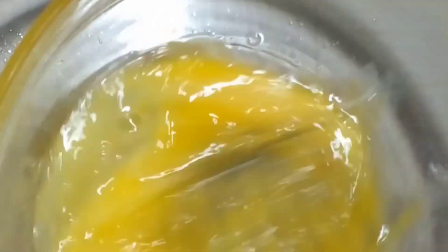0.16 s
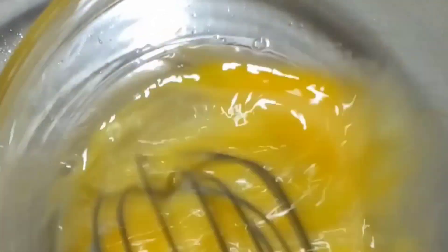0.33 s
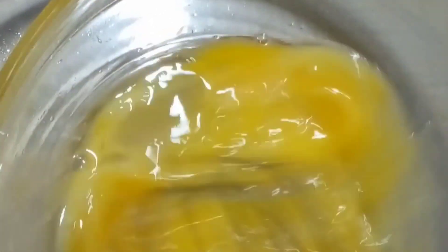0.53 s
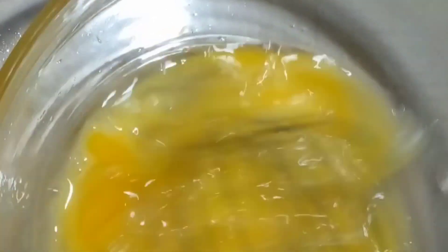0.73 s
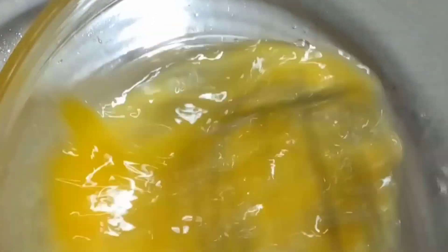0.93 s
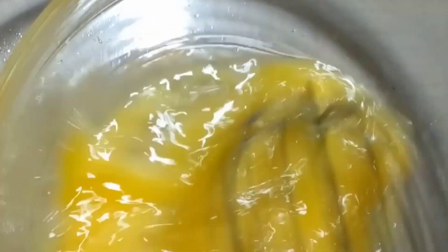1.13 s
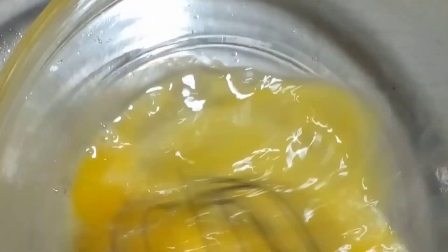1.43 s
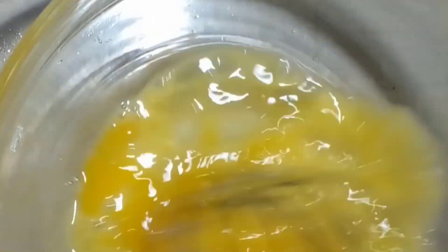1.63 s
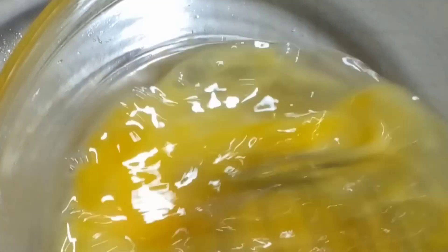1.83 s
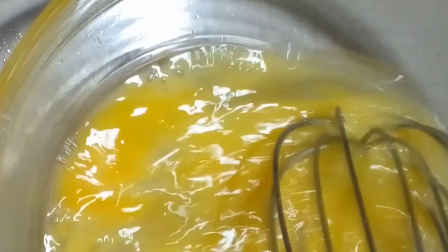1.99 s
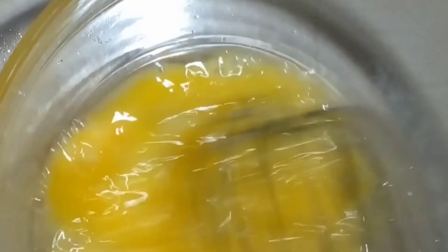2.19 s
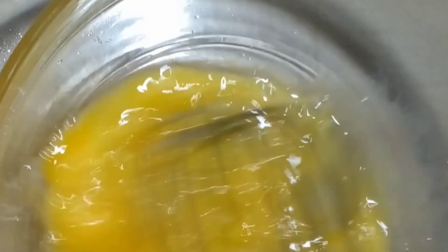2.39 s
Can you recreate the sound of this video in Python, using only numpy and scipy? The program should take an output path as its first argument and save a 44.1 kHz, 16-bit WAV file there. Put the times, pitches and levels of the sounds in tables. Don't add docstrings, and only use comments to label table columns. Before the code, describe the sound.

A wire whisk beats eggs in a glass bowl, about five rattling strokes a second, with wet plops, popping bubbles and dull bowl knocks, heard close up in a small hard-walled kitchen.

```python
import sys
import numpy as np
from scipy import signal
from scipy.fft import rfft, irfft
from scipy.io import wavfile
from scipy.ndimage import uniform_filter1d

SR = 44100
rng = np.random.default_rng(int(sys.argv[2]) if len(sys.argv) > 2 else 0)


def amplitude_ratio(level_db):
    exponent = np.asarray(level_db, float) / 20
    return 10 ** exponent


def persist_wave(psi):
    counts = np.round(np.clip(psi, -1, 1) * 32767).astype(np.int16)
    wavfile.write(sys.argv[1], SR, np.atleast_2d(counts).T)


N = 112454

# (time [s], rattle level [dB], bowl push level [dB], rattle t60 [s])
STRIKES = [(0.0014, -46.5, -67, 0.1), (0.025, -47.5, -92, 0.02), (0.078, -54, -85, 0.11),
           (0.097, -48, -73, 0.062), (0.1166, -61, -72, 0.093), (0.2264, -44.5, -60, 0.037),
           (0.2285, -22.5, -36, 0.043), (0.24, -35, -52, 0.017), (0.2794, -28.5, -41.5, 0.012),
           (0.4827, -21, -45, 0.048), (0.495, -26.5, -36.5, 0.047), (0.6885, -19, -34.5, 0.036),
           (0.6973, -22.5, -52, 0.033), (0.753, -43, -45.5, 0.017), (0.7217, -37, -34.5, 0.011),
           (0.879, -37, -79, 0.023), (0.8895, -23.5, -39, 0.035), (0.9004, -26, -42.5, 0.015),
           (0.9112, -24.5, -38, 0.027), (0.9185, -23.5, -45.5, 0.015), (0.929, -52, -34, 0.02),
           (1.082, -28.5, -41.5, 0.017), (1.1072, -30.5, -38, 0.028), (1.1657, -26.5, -43, 0.036),
           (1.3612, -32, -48.5, 0.019), (1.3873, -32, -44, 0.029), (1.5677, -35, -50, 0.03),
           (1.5784, -24, -42.5, 0.011), (1.598, -48, -46.5, 0.032), (1.5861, -38, -45, 0.013),
           (1.7559, -48, -50.5, 0.028), (1.7905, -46.5, -42.5, 0.04), (1.7955, -25, -40, 0.032),
           (1.832, -38.5, -44, 0.028), (2.0075, -23, -35, 0.05), (2.0138, -22, -34, 0.033),
           (2.026, -37, -42, 0.05), (2.0398, -34, -38, 0.039), (2.0541, -48, -38, 0.028),
           (2.116, -42, -42, 0.067), (2.2028, -40, -48, 0.032), (2.2286, -35, -46, 0.039),
           (2.2475, -42, -56, 0.016), (2.274, -41, -48, 0.033), (2.4001, -39, -45, 0.03),
           (2.445, -48, -51, 0.01)]
# (frequency [Hz], density [dB per Hz])
SCRAPE_TONE = [(150, -5), (400, -19.5), (750, -13.5), (1500, -2), (3000, 1), (8000, -7), (16000, -4)]


def unit(x):
    return x / np.sqrt(np.mean(x ** 2))


def curve(rows, hz):
    rows = np.array(rows, float)
    return np.interp(np.log(hz + 1), np.log(rows[:, 0]), rows[:, 1])


def colour(x, rows):
    gain_db = curve(rows, np.fft.rfftfreq(len(x), 1 / SR))
    return irfft(rfft(x) * amplitude_ratio(gain_db), len(x))


def butter(x, order, hz, kind):
    return signal.sosfilt(signal.butter(order, hz, kind, fs=SR, output="sos"), x)


def ring(x, hz, t60):
    r = np.exp(-np.log(1000) / (max(t60, .001) * SR))
    w = 2 * np.pi * hz / SR
    return signal.lfilter([0, r * np.sin(w)], [1, -2 * r * np.cos(w), r * r], x)


def swells(times, db, t60, rise):
    out = np.zeros(N)
    for s, level, fall in zip(times, db, np.maximum(t60, .002)):
        i = int(s * SR)
        u = np.arange(min(N - i, int(fall * SR))) / SR
        out[i:i + len(u)] += amplitude_ratio(level - 60 * u / fall) * (1 - np.exp(-u / rise))
    return out


def contacts():
    per_s, scatter_db = 11000, 2
    clump_s, clump_db = .004, 5
    chance, sign, size = rng.random((3, N))
    clicks = (chance < per_s / SR) * np.sign(sign - .5)
    clicks = unit(clicks * amplitude_ratio(-scatter_db * np.log(size + 1e-9)))
    k = int(clump_s * SR)
    steps = np.repeat(rng.standard_normal(N // k + 1), k)[:N]
    return unit(clicks * amplitude_ratio(clump_db * uniform_filter1d(steps, k // 2)))


def whisk():
    # (frequency [Hz], width [Hz], level [dB])
    wire_modes = [(2700, 67, -23.5), (3000, 100, 15), (3870, 36, -18), (4350, 170, 6), (6600, 83, -6),
                  (7580, 350, 20), (9240, 96, 15), (9840, 880, 4.5), (11160, 110, 9), (12830, 250, 12.5),
                  (16400, 300, -5)]
    rattle_db, rise_share = -2, .07
    wire_db, wire_scatter_db, wire_spread = -14, 2.5, .04
    firm_db, light_hz = -38, 2500
    grit = contacts()
    chance = np.clip(rng.standard_normal((len(STRIKES), len(wire_modes), 2)), -2, 1.3)
    bare, light, wires = np.zeros((3, N))
    for (s, db, _, t60), own in zip(STRIKES, chance):
        i, t60 = int(s * SR), max(t60, .004)
        u = np.arange(min(N - i, int((t60 + .03) * SR))) / SR
        here = slice(i, i + len(u))
        envelope = amplitude_ratio(db + rattle_db - 60 * u / t60) * (1 - np.exp(-u / (rise_share * t60)))
        rattle = grit[here] * envelope
        bare[here] += rattle
        light[here] += rattle * np.clip((firm_db - db) / 6, 0, .9)
        for (hz, width, level), (favour, bend) in zip(wire_modes, own):
            gain = amplitude_ratio(level + wire_scatter_db * favour) * np.sqrt(width / SR)
            wires[here] += gain * ring(rattle, hz * (1 + wire_spread * bend), 2.26 / max(width, 450))
    low_pass = signal.butter(2, light_hz, fs=SR, output="sos")
    bare = bare - signal.sosfiltfilt(low_pass, light)
    return colour(bare, SCRAPE_TONE) / np.std(colour(grit, SCRAPE_TONE)) + amplitude_ratio(wire_db) * wires


def glass():
    # (frequency [Hz], level [dB], t60 [s])
    bowl_modes = [(332.6, -19, 0.36), (367.9, -16.5, 0.33), (386.4, -13.5, 0.3), (433.8, -13.5, 0.25),
                  (467.7, -10, 0.32), (501.6, -5.5, 0.21), (504.7, -12, 0.45), (525.4, -2.5, 0.29),
                  (605, -18.5, 0.19), (723.5, -16.5, 0.14), (810, -22.5, .15), (928, -7.5, 0.11)]
    bowl_db, scatter_db, spread, knock_s = -0.5, 3, .012, .006
    out = np.zeros(N)
    chance = rng.standard_normal((len(STRIKES), len(bowl_modes), 3))
    for (s, _, push_db, _), own in zip(STRIKES, chance):
        i = int(s * SR)
        u = np.arange(min(N - i, SR // 2)) / SR
        knock = 1 - np.exp(-u / knock_s)
        for (hz, level, t60), (favour, bend, phase) in zip(bowl_modes, own):
            db = push_db + bowl_db + level + scatter_db * np.clip(favour, -2, 1)
            turns = hz * (1 + spread * bend) * u + phase
            out[i:i + len(u)] += knock * amplitude_ratio(db - 60 * u / t60) * np.sin(2 * np.pi * turns)
    return butter(out, 4, 290, "high")


def counter():
    # (time [s], level [dB])
    rocks = [(0.247, -42), (0.493, -39.5), (0.701, -43.5), (.9, -39), (1.111, -52), (1.37, -55),
             (1.588, -41), (1.81, -43.5), (2.02, -33.5), (2.128, -48), (2.229, -47), (2.41, -57)]
    # (frequency [Hz], level [dB], t60 [s])
    counter_modes = [(121.8, -1, 0.23), (209.9, 0.5, 0.34), (281.3, -2, 0.19)]
    push_s = 0.028
    s, db = np.array(rocks).T
    push = rng.standard_normal(N) * swells(s, db, 0 * s + 3 * push_s, push_s / 3)
    push = push / np.sqrt(push_s * SR)
    boom = sum(amplitude_ratio(level) * ring(push, hz, t60) for hz, level, t60 in counter_modes)
    return butter(boom, 4, 95, "high")


def bubbles(rows, sag=0):
    rise_s, glide, sag_s = .00025, 0.039, 0.0031
    out = np.zeros(N)
    for s, db, hz, t60 in rows:
        i, t60 = int(s * SR), max(t60, .003)
        u = np.arange(min(N - i, int(1.2 * t60 * SR))) / SR
        bent = u * (1 + glide * u / t60) + sag * sag_s * (1 - np.exp(-u / sag_s))
        envelope = amplitude_ratio(db - 60 * u / t60) * (1 - np.exp(-u / rise_s))
        out[i:i + len(u)] += envelope * np.sin(2 * np.pi * hz * bent)
    return out


def egg():
    # (time [s], peak level [dB], pitch [Hz], t60 [s])
    pops = [(0.147, -48.5, 1504, 0.041), (0.23, -21, 1444, 0.046), (0.255, -35, 3260, 0.055),
            (0.281, -29, 1420, 0.025), (0.435, -54, 3540, 0.028), (0.464, -25.5, 1332, 0.035),
            (0.485, -22, 2500, 0.022), (0.6245, -34.5, 2010, 0.018), (0.652, -39, 1840, 0.04),
            (0.691, -27, 2474, 0.029), (0.872, -49, 1560, 0.034), (0.9005, -28, 3310, 0.028),
            (0.933, -35, 1460, 0.042), (1.061, -22.5, 1773, 0.034), (1.108, -37, 2610, 0.064),
            (1.111, -38, 1640, 0.051), (1.3515, -32.5, 2154, 0.035), (1.363, -34, 927, 0.078),
            (1.3635, -26, 1500, 0.014), (1.569, -25.5, 1370, 0.048), (1.586, -21.5, 2166, 0.017),
            (1.628, -36, 1355, 0.031), (1.689, -39.5, 1414, 0.02), (1.802, -28, 2200, 0.043),
            (1.8063, -21, 1747, 0.023), (2.009, -28, 1708, 0.068), (2.155, -35.5, 1546, 0.058),
            (2.2485, -36, 2145, 0.058), (2.402, -44.5, 3520, 0.045), (2.407, -44, 2700, 0.04),
            (2.391, -47, 3200, 0.023), (2.464, -39, 1590, 0.011)]
    pop_db, pop_sag = -3, 0.085
    slosh_per_s, slosh_db, slosh_t60_s = 250, -29.5, 0.23
    s, db, _, _ = np.array(STRIKES).T
    wake = swells(s, db - db.max(), 0 * s + slosh_t60_s, 0.02)
    small = []
    for when, pitch, weakness in rng.random((int(slosh_per_s * N / SR), 3)):
        hz = 1000 * 5 ** pitch
        small.append((when * (N - 1) / SR, slosh_db - 24 * weakness, hz, 45 / hz))
    return amplitude_ratio(pop_db) * bubbles(pops, pop_sag) + wake * bubbles(small) + lingering()


def lingering():
    # (time [s], level [dB], start pitch [Hz], end pitch [Hz], t60 [s])
    soft_notes = [(0.15, -57, 1600, 1550, .3), (0.24, -43, 1470, 1450, .35), (0.24, -46, 3800, 3780, .3),
                  (0.49, -45, 1450, 1400, .3), (1.388, -38, 910, 1010, .25), (1.375, -48, 1500, 1600, .15),
                  (1.594, -42, 2300, 2290, .3), (1.58, -41, 1450, 1320, .3), (1.825, -43, 2300, 2250, .2),
                  (1.832, -44, 3000, 2950, .12), (2.02, -42, 1500, 1480, .3), (2.27, -51, 3000, 3100, .15)]
    rise_s, width_hz = .012, 90
    out = np.zeros(N + SR)
    u = np.arange(SR // 3) / SR
    for s, db, hz, end_hz, t60 in soft_notes:
        drift = uniform_filter1d(rng.standard_normal((2, len(u))), int(SR / width_hz / 2))
        waver = .5 + .9 * (drift[0] + 1j * drift[1]) / np.std(drift)
        turns = end_hz * u + (hz - end_hz) * t60 / 4 * (1 - np.exp(-4 * u / t60))
        envelope = amplitude_ratio(db - 60 * u / t60) * (1 - np.exp(-u / rise_s))
        i = int(s * SR)
        out[i:i + len(u)] += envelope * np.imag(waver * np.exp(2j * np.pi * turns))
    return out[:N]


def film_ticks():
    # (time [s], peak level [dB], centre frequency [Hz], t60 [s])
    bursts = [(0.1471, -47, 6530, 0.0072), (0.117, -49, 4040, .02), (0.4334, -44, 3470, 0.0061),
              (0.4515, -36, 4130, 0.0085), (0.4568, -37, 6700, 0.008), (0.4618, -38.5, 1590, 0.037),
              (0.619, -46, 6860, 0.013), (0.6529, -48, 3360, 0.01), (0.6604, -49, 6920, 0.0057),
              (0.684, -50, 5800, 0.066), (1.0579, -36, 1860, 0.03), (1.1137, -21.5, 6770, 0.0049),
              (1.262, -49, 3530, 0.0073), (1.351, -34.5, 3310, 0.017), (1.364, -37, 4200, 0.009),
              (1.3758, -40, 7260, 0.016), (1.5112, -50, 6990, 0.0098), (1.757, -40, 6750, 0.0068),
              (1.8048, -31, 3360, 0.013), (1.833, -42, 7170, 0.017), (2.0043, -30, 5960, 0.02),
              (2.1533, -44.5, 3330, 0.015), (2.2048, -45, 8200, 0.014), (2.2492, -30, 4360, 0.0098),
              (2.3792, -54, 3200, 0.014), (2.4671, -34.5, 10150, 0.0086), (2.4941, -39.5, 5750, 0.0072)]
    tick_db, note_db, rise_s = -5.5, 5.5, .0003
    s, db, hz, t60 = np.array(bursts).T
    spit = unit(colour(rng.standard_normal(N), SCRAPE_TONE)) * swells(s, db, t60, rise_s)
    notes = bubbles(np.array([s, db + note_db, hz, t60]).T)
    return amplitude_ratio(tick_db) * (spit + notes)


def kitchen(x):
    # (frequency [Hz], t60 [s])
    fade = [(100, 0.33), (260, 0.99), (700, 0.96), (1840, 0.48), (4850, 0.43), (12800, 0.26)]
    wet_db, gap_s = -3.5, 0.0017
    t = np.arange(SR) / SR
    tail = 0
    for hz in 60 * 2 ** np.arange(0, 8.2, .5):
        band = butter(rng.standard_normal(len(t)), 2, [hz / 1.19, hz * 1.19], "band")
        t60 = curve(fade, hz)
        tail = tail + band * amplitude_ratio(-60 * t / t60) / np.sqrt(t60)
    tail = tail * np.clip(t / gap_s - .5, 0, 1)
    tail = tail / np.sqrt(np.sum(tail ** 2))
    return amplitude_ratio(wet_db) * signal.fftconvolve(x, tail)[:N]


def hush():
    # (frequency [Hz], density [dB per Hz])
    hush_tone = [(15, -50), (25, -0.5), (308, -10), (503, -8), (778, -25), (1770, -10.5), (13300, -25.5),
                 (15700, -31), (17000, -55)]
    return amplitude_ratio(-67.5) * unit(colour(rng.standard_normal(N), hush_tone))


def scene():
    # (frequency [Hz], level [dB])
    port_width = [(60, -28), (300, -50), (2400, -40.5), (4400, -34), (8000, -18.5), (15000, -18)]
    wires, bowl, froth, spits = whisk(), glass() + counter(), egg(), film_ticks()
    near = wires + bowl + froth + spits
    sent = wires + amplitude_ratio(-12) * bowl + amplitude_ratio(-9) * froth + amplitude_ratio(-10) * spits
    mid, other = (kitchen(sent) + hush() for _ in range(2))
    side = colour(other + np.roll(near, 13) - np.roll(near, -13), port_width)
    return np.array([near + mid + side, near + mid - side])


def top_cut(x):
    return signal.sosfilt(signal.butter(12, 17150, fs=SR, output="sos"), x)


def record(dry):
    # (frequency [Hz], level [dB])
    mic_tone = [(35, -10), (110, 1.78), (4100, 2.5), (5100, -1), (6500, 4), (7300, -3.5), (7900, 0),
                (13000, 4)]
    ceiling, top_hz = .15, 15400
    rounded = ceiling * np.tanh(dry / ceiling)
    mix = np.array([colour(channel, mic_tone) for channel in rounded])
    mix = signal.sosfilt(signal.ellip(5, .5, 28, top_hz, fs=SR, output="sos"), mix)
    return top_cut(mix)


dry = scene()
out = record(dry)
persist_wave(out)
```